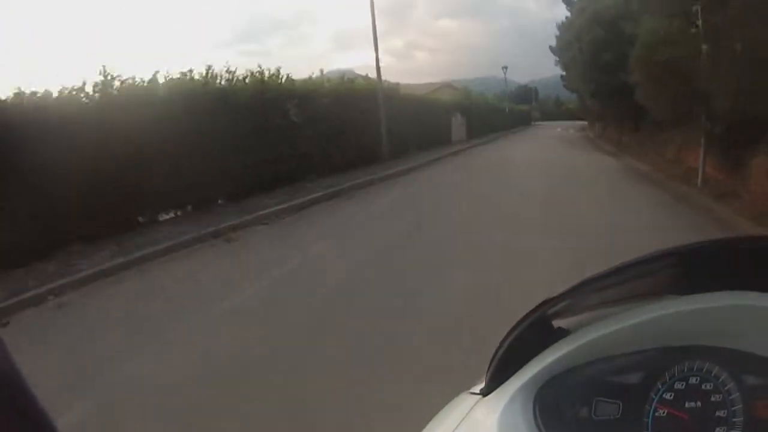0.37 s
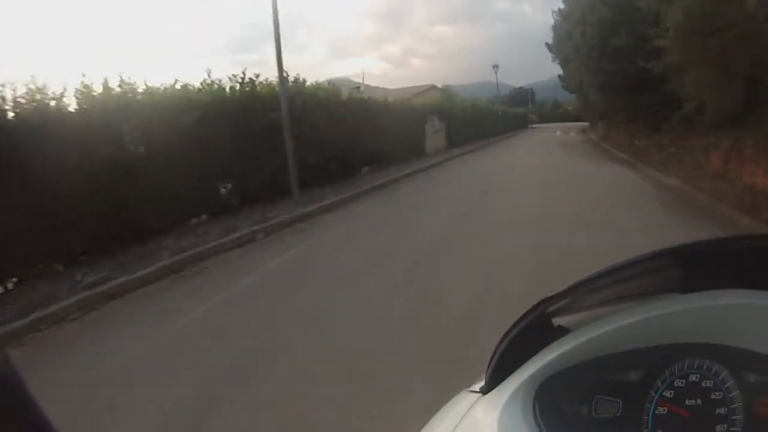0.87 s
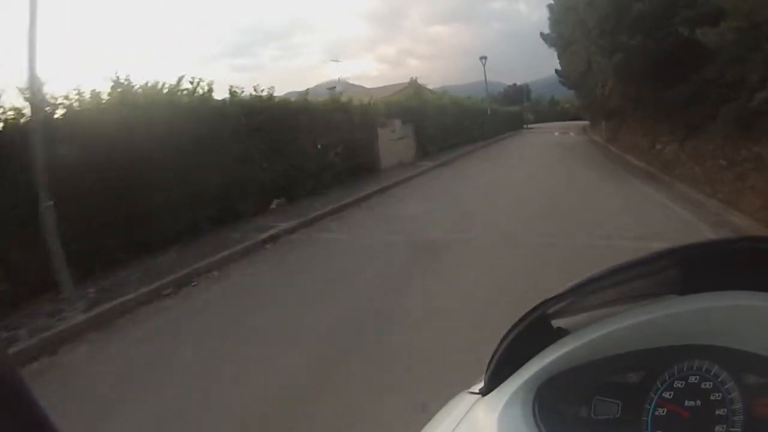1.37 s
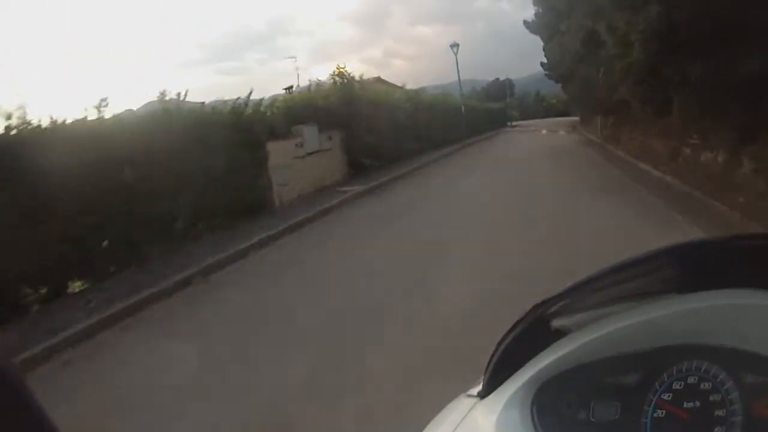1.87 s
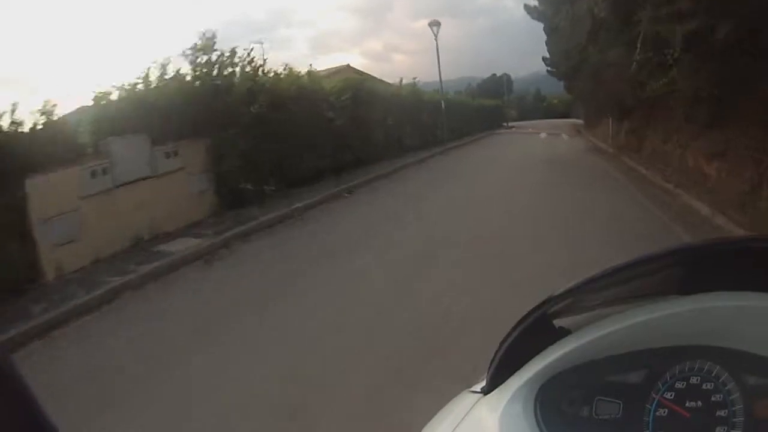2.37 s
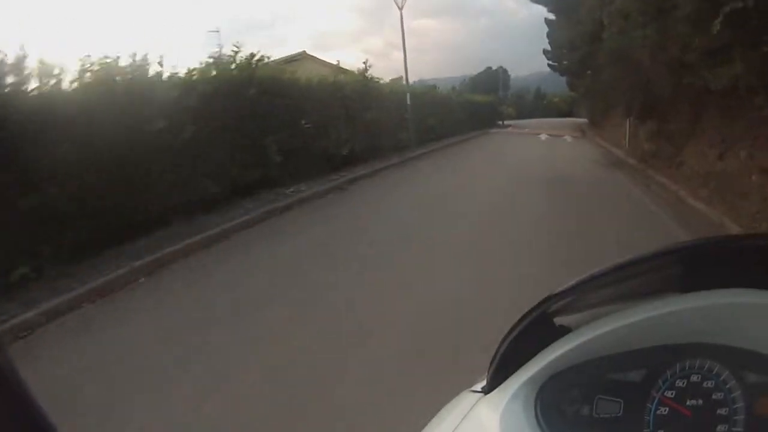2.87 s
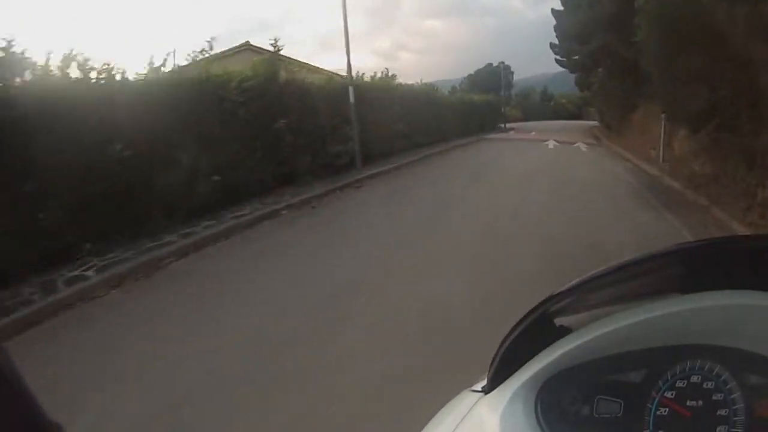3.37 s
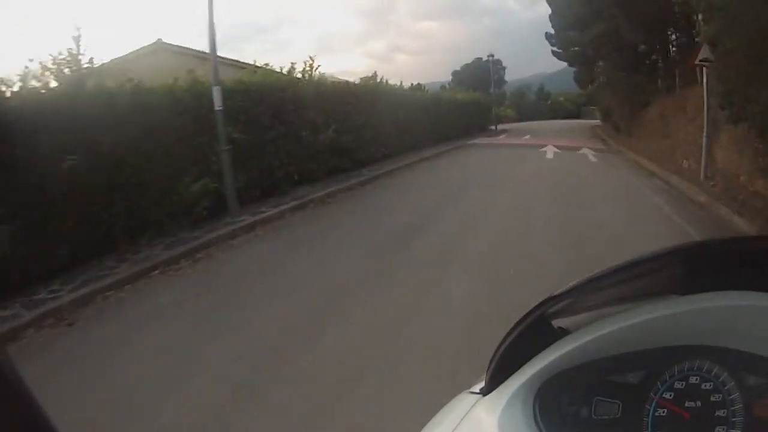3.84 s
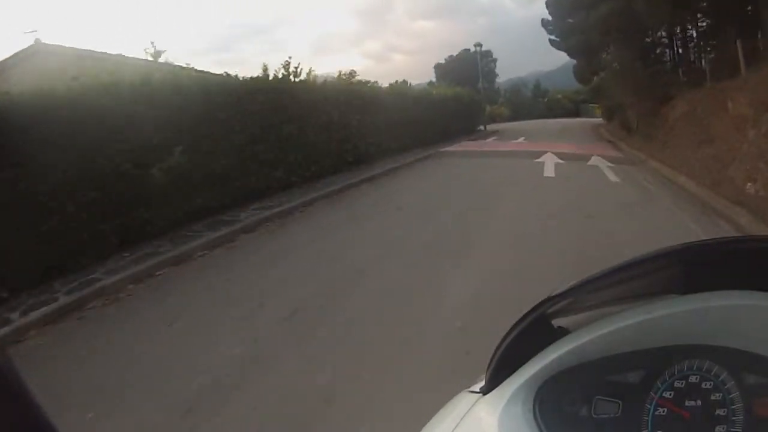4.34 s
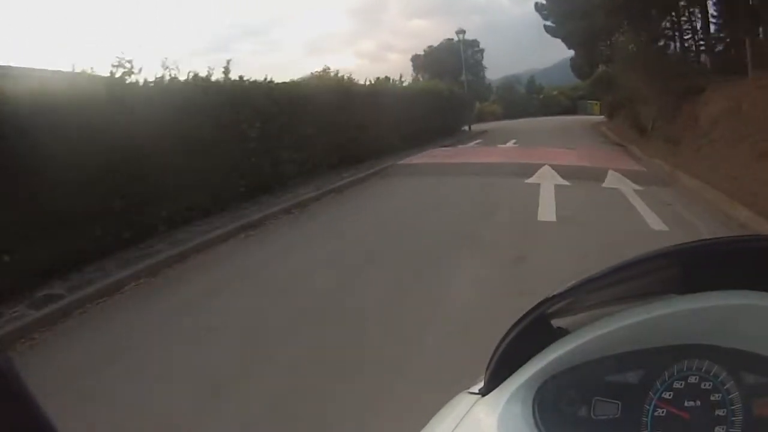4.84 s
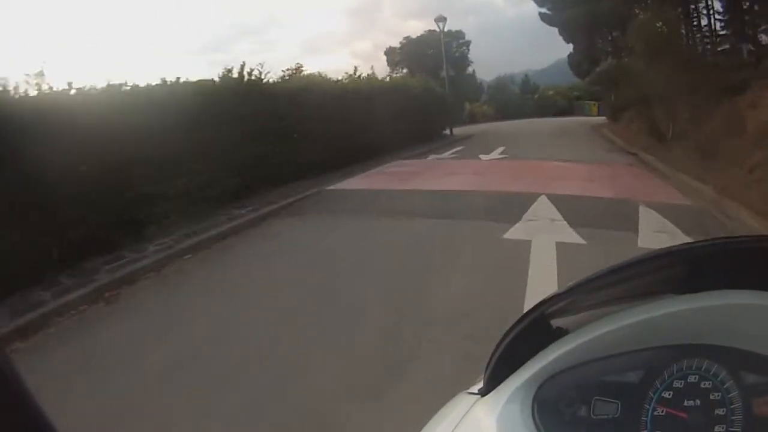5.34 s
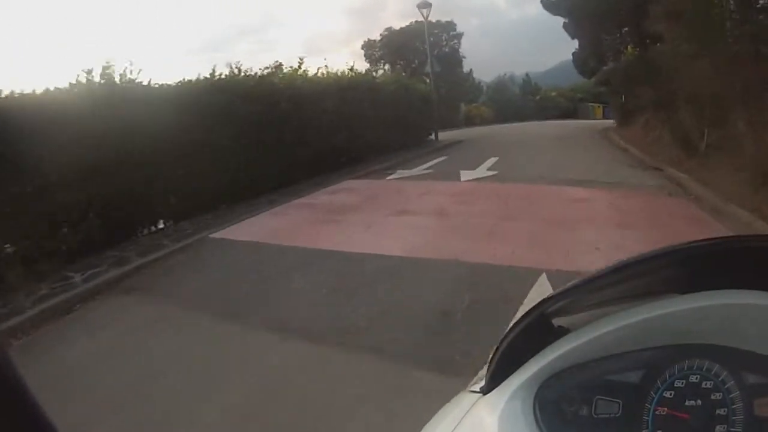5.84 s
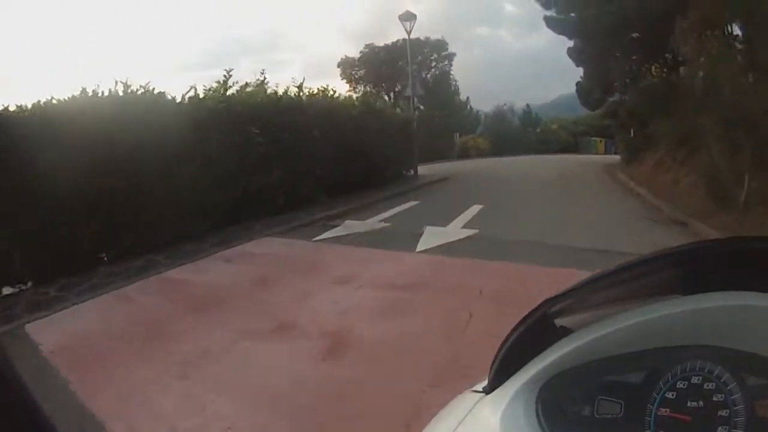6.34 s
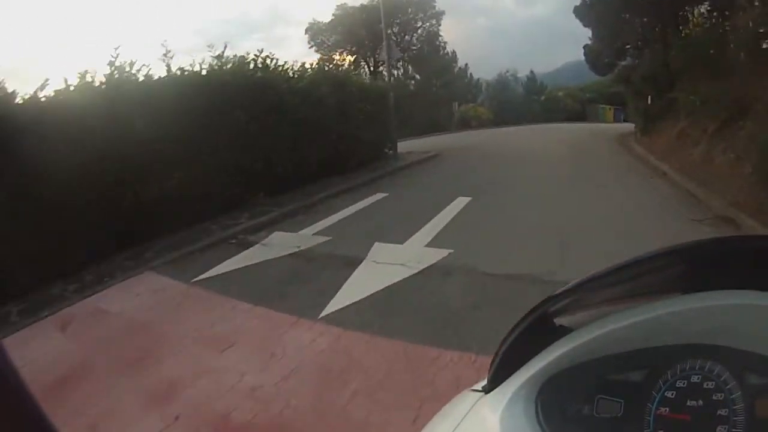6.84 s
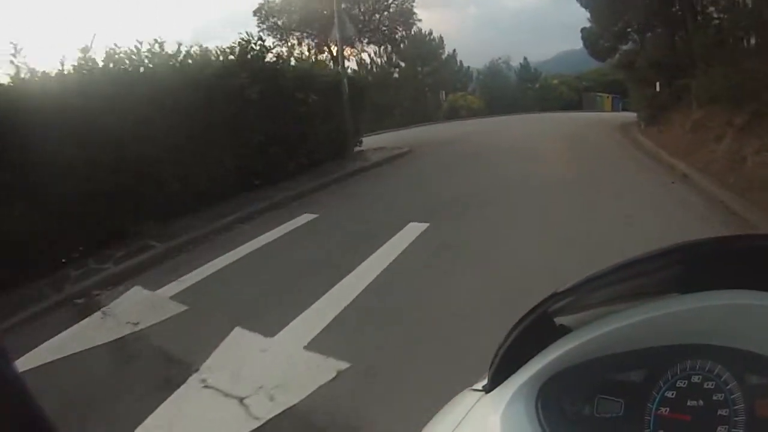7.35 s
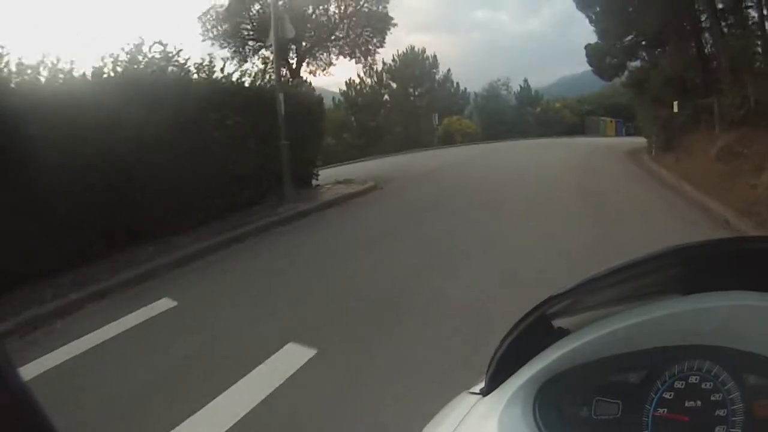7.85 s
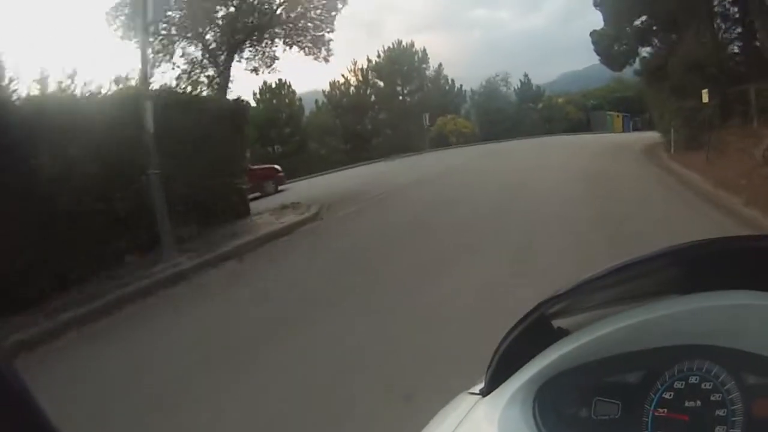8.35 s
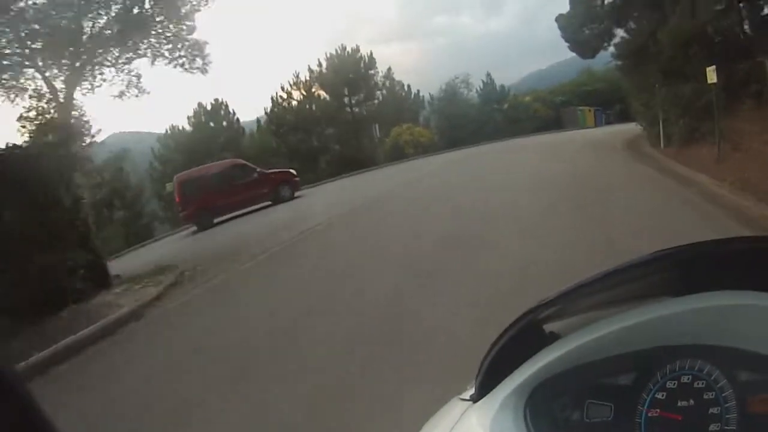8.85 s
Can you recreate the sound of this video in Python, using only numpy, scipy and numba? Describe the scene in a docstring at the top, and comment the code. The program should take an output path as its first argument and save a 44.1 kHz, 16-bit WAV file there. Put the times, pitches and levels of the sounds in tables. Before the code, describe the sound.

A small scooter engine drones deep and muffled, slows over a speed hump with dull knocks and rattles, then pulls away with rising revs.

```python
"""Road with a speed hump: a small single-cylinder scooter slows for it and pulls away, heard inside a closed case on the bike.
Engine: sine orders of the firing rate through the mount; bumps add a swaying tone. Tyre tread: fuzzy hum and octave.
Rumble, drone and wind: noise shaped by road, frame and case. Knocks: noise bursts ringing case, lid, edge and frame.
Squeaks: brief rough tones. A gain control works in small steps, which tick on the bass peaks."""
import sys
import numpy as np
from scipy import signal
from scipy.fft import rfft, irfft, next_fast_len
from scipy.io import wavfile
from scipy.ndimage import uniform_filter1d, map_coordinates
from numba import njit

SR = 44100
rng = np.random.default_rng(int(sys.argv[2]) if len(sys.argv) > 2 else 0)


def master_out(mix):
    """Clip the mix to full scale and print it as 16-bit PCM to the path in sys.argv[1]."""
    frames = np.transpose(np.atleast_2d(mix))
    ceiling = np.clip(frames, -1, 1)
    pcm = np.round(ceiling * 32767).astype(np.int16)
    wavfile.write(sys.argv[1], SR, pcm)


def gain_from_db(level_db):
    """Turn a decibel level (scalar or array-like) into a linear amplitude factor."""
    decades = np.asarray(level_db, float) / 20
    return 10 ** decades


N = 406154
T = np.arange(N) / SR

# engine course: (time [s], firing rate [Hz], effort [dB])
ENGINE_COURSE = [(0, 39.09, 1.5), (1.79, 39.47, -.5), (2.15, 39.26, -1), (2.3, 38, 0), (2.59, 33.15, 2),
                 (2.95, 31.12, -2), (3.26, 29.94, 1.5), (4.36, 27.26, 1), (5.05, 25.26, -3),
                 (5.41, 23.52, -0.5), (5.9, 22.39, 0), (6.38, 21.64, -1), (6.56, 20.25, -6),
                 (7.13, 24.19, -2.5), (7.4, 25.33, 2.5), (7.64, 29.87, 3.5), (8.08, 33.5, 0.5),
                 (8.69, 37.48, 1.5), (9.21, 38.4, -2.1)]
# low orders: (multiple, level [dB], signed factor, gain at full pull [dB]); the inverted fourth sharpens the crests
LOW_ORDERS = [(1, 0, 0.96, -2), (2, -0.1, 0.93, 1.5), (3, -9.5, 0.79, 5), (4, 0.06, -1, 1.5)]
# weak upper orders: (multiple, level over their base [dB])
UPPER_ORDERS = [(5, -21), (6, -20.5), (7, -19), (8, -17), (11, -27.5), (12, -26)]
# level at which the mount passes an order: (frequency [Hz], level [dB rms])
MOUNT_RESPONSE = [(20, -31), (30, -23), (34, -12.5), (39, -9), (46, -11), (53, -21), (62, -14), (70, -17.5),
                  (79, -24.5), (100, -28), (125, -24), (160, -27)]
# tyre tread hum, following road speed: (time [s], frequency [Hz], level [dB], octave level [dB])
TREAD_HUM = [(0, 82.19, -41.5, -59), (2.3, 95.14, -36, -51), (3.5, 87.9, -39.5, -39),
             (4.2, 84.25, -24.5, -36), (5, 74.25, -24, -43), (5.5, 64.9, -23, -35), (6, 59.8, -25, -39.5),
             (6.6, 53.8, -43.5, -57.5), (9.21, 75.28, -44.5, -52)]
# how hard road and air work on the bike: (time [s], roughness [dB])
ROUGHNESS = [(0, 4.5), (0.56, -0.5), (1.69, 1.5), (2.0, 0.5), (2.82, 1), (3.0, 1), (3.74, 4.5), (5.0, 7.5),
             (5.26, 8.5), (5.69, 8.5), (5.9, -1.5), (6.31, -0.5), (6.49, -5), (7.2, -1.5), (7.59, 2),
             (8.23, 2), (9.21, -0.5)]
# road rumble spectrum: (frequency [Hz], relative density [dB])
RUMBLE_SPECTRUM = [(8, -25.5), (15, -6.5), (24, 4), (30, 10), (38, 10), (47, -3.5), (60, -4.5), (100, -8.5),
                   (150, -16), (200, -27.5), (400, -120)]
# Resonance widths below are taken at -7.5 dB.
# frame modes: (frequency [Hz], width [Hz], level [dB])
FRAME_MODES = [(155.6, 50, -0.5), (236, 69, -4.5), (270.3, 44, 2.5), (311.5, 45, 0.5), (343, 62, -4.5),
               (412.3, 70, -4.5), (442, 120, -12.5), (560, 390, -23)]
# closed case resonances: (frequency [Hz], width [Hz], level [dB])
CASE_MODES = [(668, 100, -1), (711.4, 75, 1.5), (900.5, 90, -6), (1127, 89, 1), (1411, 333, 1.5),
              (1560, 120, -6), (1781, 260, 2.5), (2030, 240, 0), (2273, 338, -3.5), (3010, 290, -16.5),
              (3690, 370, -27.5), (4700, 360, -41), (5180, 170, -34), (5570, 110, -32), (6700, 3800, -41.5)]
# case lid resonances: (frequency [Hz], width [Hz], level [dB])
LID_MODES = [(718, 120, -6), (1112, 110, -4.5), (1425, 150, -4)]
# bright edge of a knock: (frequency [Hz], width [Hz], level [dB])
EDGE_MODES = [(3370, 1100, 8), (4830, 350, 2.5), (5540, 460, -2), (7460, 730, -10.5), (8900, 820, -7),
              (11000, 1700, -31.5)]
# air in two high narrow case resonances: (level at rest [dB], gain per dB of roughness [dB])
WHISTLE_LEVEL = (-83.5, 0.99)
# spells in which everything rises: (start [s], end [s], gain [dB])
SURGE_SPELLS = [(-1, 2.79, 5.5), (1.87, 1.92, 7), (6.185, 6.215, 2), (6.625, 6.67, 1.5), (8.385, 8.42, 3.5),
                (8.67, 8.77, 2.5), (8.895, 9.13, 6.5), (9.14, 10, 3)]
# knocks of loose parts, before path gains: (time [s], blow [dB], lid, treble, thud over blow [dB])
KNOCK_BLOWS = [(0.048, -19, -7, -18, 0), (3.181, -19.5, -9, -25, 3.5), (3.188, -18.5, -9.5, -21, -2),
               (3.2243, -27.5, -23, -35, -2), (3.297, -22.5, -20, -16, -12), (3.953, -21, -17, -49, 1.5),
               (3.998, -27, -3.5, -32, 2), (5.113, -13.5, -37, -54, 1), (5.3885, -14.5, -26, -46, -19),
               (5.414, -18.5, -29, -49, -15), (5.4258, -26.5, -18, -41, 2), (5.7175, -21.5, -24, -31, -7),
               (5.7465, -18.5, -21, -49.5, -8), (5.7914, -24.5, -17, -29, -15),
               (5.8418, -22.5, -36, -5.5, 6), (5.8568, -8, -29, -15, -5.5), (5.8602, -4, -16, -42, -8),
               (5.868, -17, -18, -33, 1), (5.876, -21.5, -17, -29, -13), (6.097, -24.5, -20.5, -27, -6.5),
               (6.1745, -25.5, -16, -37, -1.5), (6.229, -15, -13.5, -45.5, -12),
               (6.268, -27.5, -15, -45.5, -7), (6.339, -36, -1.5, -45.5, 10), (6.352, -25, -19, -43, 3),
               (6.448, -29.5, -19, -40.5, -4), (6.5707, -24.5, -24, -38.5, -23),
               (6.583, -29.5, -23, -39, -21), (6.79, -39.5, -10, -39, 16), (6.8904, -29, -21.5, -38, -18.5),
               (7.43, -18.5, -15, -51.5, 3), (7.6401, -25, -26.5, -24, -9), (7.714, -26.5, -15, -22, -5),
               (7.75, -26.5, -21, -37.5, -10), (7.7643, -23.5, -25, -43.5, -14.5),
               (7.82, -28, -26.5, -50, -12.5), (7.992, -27, -17, -42.5, -7.5),
               (8.755, -35.5, -20, -39, 10.5)]
# small rattles over their blow: (lid [dB], treble [dB], thud [dB])
RATTLE_COLOUR = (-18, -33, -6.5)
# relative speed of strike and decay: (case, lid, edge, frame)
BLOW_PACE = (1.27, 1.6, 1.8, 0.53)
# brief bass swells: (time [s], gain [dB])
BASS_SWELLS = [(.05, 3), (.112, 3.5), (.215, 3), (.265, 3), (.36, 3.5), (.436, 2.5), (.475, 2.5), (.585, 4),
               (.75, 4), (.795, 2.5), (.915, 4), (1.09, 4.5), (1.205, 2.5), (1.32, 4.5), (1.432, 2.5),
               (1.55, 3.5), (1.64, 2.5), (1.69, 2.5), (1.79, 3.5), (2.09, 4), (2.17, 2.5), (2.23, 3),
               (2.35, 4), (2.487, 3), (2.605, 2.5), (2.665, 3), (2.757, 3), (6.203, 6), (8.405, 3),
               (8.68, 3.5), (8.757, 4), (8.94, 2.5), (9.075, 2.5)]
# bumps that set the mount swinging: (time of widest swing [s], level [dB], frequency [Hz], length / 1.2 [s])
SWAY_BUMPS = [(3.188, -12, 33.06, 0.11), (3.312, -12.5, 32.1, 0.064), (3.554, -12.5, 35.48, 0.17),
              (3.77, -11.5, 35.57, 0.11), (3.927, -11.5, 35.15, 0.17), (4.138, -11, 35.12, 0.16),
              (4.36, -8, 36.57, 0.28), (4.656, -11, 36.92, 0.26), (4.844, -9, 38.6, 0.12),
              (5.047, -11.5, 36.02, 0.095), (5.189, -13.5, 34.23, 0.13), (5.354, -11, 37.17, 0.063),
              (5.603, -16.5, 34.9, 0.25), (5.819, -7.5, 33.75, 0.096), (6.014, -13, 32.63, 0.26),
              (6.222, -5.5, 40.78, 0.13), (6.414, -11, 37.52, 0.2), (6.601, -5, 39.18, 0.27),
              (6.798, -7.5, 39.16, .08), (6.988, -8, 44.4, .13), (7.096, -7.5, 36.74, 0.065),
              (7.337, -9, 38.72, 0.12), (7.508, -8.5, 38.66, 0.11), (7.711, -19, 36.63, 0.3),
              (7.88, -12.5, 39.3, .14), (8.005, -23.5, 37.17, 0.13), (8.365, -9, 35.46, 0.12)]
# squeaks: (time [s], frequency [Hz], level [dB], length [s])
SQUEAK_TONES = [(4.001, 3757, -60.5, 0.088), (4.569, 3790, -62, 0.098), (4.81, 4000, -67, 0.023),
                (6.409, 1476, -34.5, 0.019), (7.33, 3676, -60, 0.012), (7.408, 3734, -68.5, 0.022),
                (7.761, 3764, -58, 0.014)]
# microphone hiss spectrum: (frequency [Hz], relative density [dB])
HISS_SPECTRUM = [(2000, -5), (5000, -2.5), (9000, -15), (12000, -20), (16000, -36)]


def unit(x):
    """Scale to rms 1."""
    return x / np.sqrt(np.mean(x ** 2) + 1e-20)


def curves(rows):
    """One value per sample for each column after the time."""
    s, *cols = np.transpose(rows)
    return [np.interp(T, s, c) for c in cols]


def wobble(rate_hz):
    """Smooth random curve, rate_hz knots a second."""
    return map_coordinates(rng.standard_normal(int(N * rate_hz / SR) + 4), [T * rate_hz])


def noise():
    """White noise of rms 1."""
    return rng.standard_normal(N)


def filtered(x, response):
    """Apply a complex response of frequency to x."""
    m = 2 * next_fast_len(N // 2 + SR // 4)
    return irfft(rfft(x, m) * response(np.fft.rfftfreq(m, 1 / SR)), m)[:N]


def sloped(points):
    """Gain interpolated between (Hz, dB) points on a log axis."""
    f, db = np.transpose(points)
    return lambda hz: gain_from_db(np.interp(np.log(hz + 1), np.log(f + 1), db))


def ringing(modes):
    """Steep-sided resonances, minimum phase so that a blow comes before its ring."""
    def response(f):
        power = sum(gain_from_db(db) ** 2 / (1 + (2 * (f - c) / w) ** 2) ** 2.49 for c, w, db in modes)
        cepstrum = irfft(np.log(power) / 2)
        k = np.arange(len(cepstrum))
        causal = np.where(k == 0, 1, 2 * (k < len(f) - 1))
        return np.exp(rfft(cepstrum * causal))
    return response


def tone(hz):
    """Sine of rms 1 that follows a pitch curve."""
    return np.sqrt(2) * np.sin(2 * np.pi * np.cumsum(hz) / SR)


def engine():
    """Each firing rocks the frame: low orders of the firing rate pass the mount; upper ones are unsteady."""
    pull_hz_per_s = 4.9  # scale at which the effect of changing revs levels off
    merge_hz, merge_width_hz, merge_db = 41.3, 3.2, 14  # order 2 dips here, merging into the sway
    rate_hz, effort_db = curves(ENGINE_COURSE)
    rev_change = uniform_filter1d(np.gradient(rate_hz) * SR, size=SR // 5)
    pull = np.tanh(rev_change / pull_hz_per_s)
    dip_db = merge_db * np.exp(-((2 * rate_hz - merge_hz) / merge_width_hz) ** 4)
    mount = sloped(MOUNT_RESPONSE)
    out = np.zeros(N)
    for k, db, sign, pull_db in LOW_ORDERS:
        level_db = effort_db + db + pull_db * pull - (k == 2) * dip_db + 0.6 * wobble(12)
        out += mount(k * rate_hz) * gain_from_db(level_db) * sign * tone(k * rate_hz)
    base_db = -27 + 0.37 * (rate_hz - 39)  # upper orders weaken as the revs drop
    for k, db in UPPER_ORDERS:
        out += gain_from_db(base_db + db + 2.4 * wobble(5.6)) * tone(k * rate_hz)
    return out


def tread():
    """Tread blocks hum with unsteady pitch, with an octave and the wheel's slower beat."""
    hz, db, octave_db = curves(TREAD_HUM)
    hz = hz * (1 + 0.018 * wobble(12))
    hum = gain_from_db(db + 5.2 * wobble(9.8)) * tone(hz)
    octave = gain_from_db(octave_db + 1.2 * wobble(14)) * tone(2 * hz)
    beat = gain_from_db(-25 + 2.2 * wobble(4.8)) * tone(hz / 4)
    return hum + octave + beat


def flow():
    """Road and air noise excites frame and case: rumble, drone, wind and whistle follow the roughness."""
    rough_db, = curves(ROUGHNESS)
    lumps = wobble(30)  # shared by drone and wind
    rumble_db = -22.5 + 0.8 * rough_db + 2.5 * wobble(3)
    rumble = gain_from_db(rumble_db) * unit(filtered(noise(), sloped(RUMBLE_SPECTRUM)))

    throttle_shut_db = 2.5 * np.exp(-((T - 3.3) / 0.96) ** 2)  # extra drone as the throttle shuts
    drone_db = -35 + 0.98 * rough_db + throttle_shut_db + 0.72 * lumps + 0.48 * wobble(6.5)
    drone_grit = gain_from_db(1.8 * wobble(60)) * noise()
    drone = gain_from_db(drone_db) * unit(filtered(drone_grit, ringing(FRAME_MODES)))

    wind_grit = gain_from_db(0.76 * lumps + 1.0 * wobble(150)) * noise()
    wind = gain_from_db(-44 + 0.92 * rough_db) * unit(filtered(wind_grit, ringing(CASE_MODES)))

    rest_db, slope = WHISTLE_LEVEL
    whistle_db = rest_db + slope * rough_db + 2.4 * wobble(20)
    whistle = gain_from_db(whistle_db) * unit(filtered(noise(), ringing(CASE_MODES[12:14])))
    return rumble + drone + wind + whistle


def surge():
    """Gain of the whole mix: each spell ramps in and out."""
    ramp_s = 0.04
    return gain_from_db(sum(db * np.clip(np.minimum(T - a, b - T) / ramp_s + 0.5, 0, 1) for a, b, db in SURGE_SPELLS))


def chance_rattles():
    """Small knocks of one colour at random times, with exponential gaps and level spread."""
    per_s, floor_db, spread_db = 4.3, -40, 0.5
    chance = rng.random(size=(64, 2))
    times = 0.017 + np.cumsum(-np.log(chance[:, 0])) / per_s
    return [(s, floor_db - spread_db * np.log(u), *RATTLE_COLOUR)
            for s, u in zip(times, chance[:, 1]) if s < N / SR]


def knocks():
    """Each blow is a noise burst that rings the case, its lid, the bright edge and the frame."""
    t60_s, rise_s = 0.032, 0.0023  # before pace and stretch
    paths = [ringing(CASE_MODES[2:3] + CASE_MODES[4:-1]), ringing(LID_MODES),
             ringing(EDGE_MODES), ringing(FRAME_MODES)]
    path_gains_db = (15.17, 37.6, 13.5, 20)
    blows = np.zeros((len(paths), N + SR))
    t = np.arange(SR // 8) / SR
    for s, db, lid_db, treble_db, thud_db in KNOCK_BLOWS + chance_rattles():
        stretch = 1 + 1.2 / (0.5 + np.exp(treble_db + 46))  # dull knocks are slower scuffs, up to 3.4 times
        u = np.outer(BLOW_PACE, t) / stretch
        shape = gain_from_db(-60 * u / t60_s) * (1 - np.exp(-u / (stretch * rise_s)))
        levels = gain_from_db(db + np.array([0, lid_db, treble_db, thud_db]))[:, None]
        start = round((s - 0.003 * stretch) * SR)
        blows[:, start:][:, :len(t)] += levels * rng.standard_normal(len(t)) * shape
    return sum(gain_from_db(db) * filtered(b[:N], path) for db, b, path in zip(path_gains_db, blows, paths))


def swell():
    """Gain of engine and sway: brief bell-shaped rises."""
    width_s = 0.02
    return gain_from_db(sum(db * np.exp(-((T - s) / width_s) ** 2) for s, db in BASS_SWELLS))


def sway():
    """Bumps swing the mount: each swells and fades alike, pitch drifting from bump to bump."""
    s, _, hz, _ = np.transpose(SWAY_BUMPS)
    swing = sum(gain_from_db(db) * np.cos(np.pi * np.clip((T - at) / (1.2 * life), -0.5, 0.5))
                for at, db, _, life in SWAY_BUMPS)
    return swing * tone(np.interp(T, s, hz))


def squeaks():
    """Rubbing parts give brief tones, unsteady in level and pitch."""
    grip, waver = wobble(150), wobble(250)
    out = np.zeros(N)
    for s, hz, db, life in SQUEAK_TONES:
        envelope = gain_from_db(db + 4.2 * grip) * np.exp(-(1.9 * (T - s) / life) ** 2)
        out += envelope * tone(hz * (1 + 0.016 * waver))
    return out


def scene():
    """Sum of all sources; the swells act on the bass, the surges on everything, the last 4 ms fade."""
    bass = swell() * (engine() + sway())
    mix = surge() * (bass + tread() + flow() + knocks() + squeaks())
    fade = np.clip((T[-1] - T) / 0.004, 0, 1)
    return (mix * fade)[None]


@njit
def stepped_gain(x, armed, top, step, lag, attack, release, calm):
    """Step down while the smoothed output is over top, else slowly back up to 1 where the wave is small."""
    gain, g, level, wait = np.empty(len(x)), step ** 11, 0., 0
    for i in range(len(x)):
        level += lag * (abs(x[i]) * g - level)
        wait += 1
        # once more than three steps down, it stays awake without being armed
        if (armed[i] or g < step ** 3) and level > top and wait >= attack[i]:
            g, wait = g * step, 0
        elif wait >= release[i] and g < 1 and abs(x[i]) * g < calm[i]:
            g, wait = min(g / step, 1.), 0
        gain[i] = g
    return gain


def gain_control(dry):
    """Stepped gain, woken by sustained loudness, with uneven waits between steps."""
    armed = uniform_filter1d(dry[0] ** 2, size=1300) > gain_from_db(-4) ** 2
    uneven = np.repeat(rng.exponential(size=N // 32 + 1), 32)[:N]
    attack_samples = 27 + 20 * uneven
    release_samples = (200 + 300 * uneven) * gain_from_db(2 * wobble(7))
    gain = stepped_gain(dry[0], armed, 0.55, gain_from_db(-0.58), 0.022, attack_samples, release_samples, 0.27 * uneven)
    return dry * uniform_filter1d(gain, size=3)


def block_ticks(x):
    """Each block sits a little early or late: faint ticks at the joins where the wave is steep."""
    blocks_per_s, slip_s = 375, 1.3e-5  # slip is a standard deviation
    block = (T * blocks_per_s).astype(int)
    slip_samples = slip_s * SR * rng.standard_normal(N // 64)[block]
    return x + slip_samples * np.gradient(uniform_filter1d(x, size=60), axis=1)


def overload(x):
    """Soft saturation towards 0.9."""
    return x / (1 + np.abs(x / 0.9) ** 6) ** (1 / 6)


def top_cut(x):
    """Nothing passes above the cut-off."""
    return signal.sosfilt(signal.butter(12, 15850, fs=SR, output="sos"), x)


def record(dry):
    """Gain control, block ticks, soft overload, then microphone hiss."""
    x = overload(block_ticks(gain_control(dry)))
    hiss = gain_from_db(-75) * unit(filtered(noise(), sloped(HISS_SPECTRUM)))
    return top_cut(x + hiss)


dry = scene()
out = record(dry)
master_out(out)
```